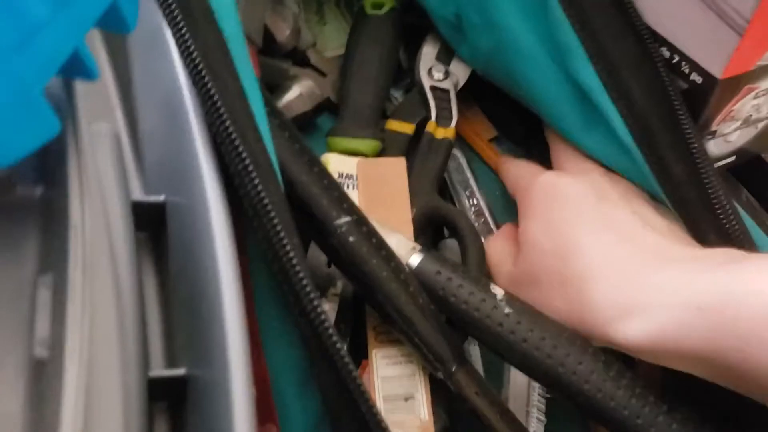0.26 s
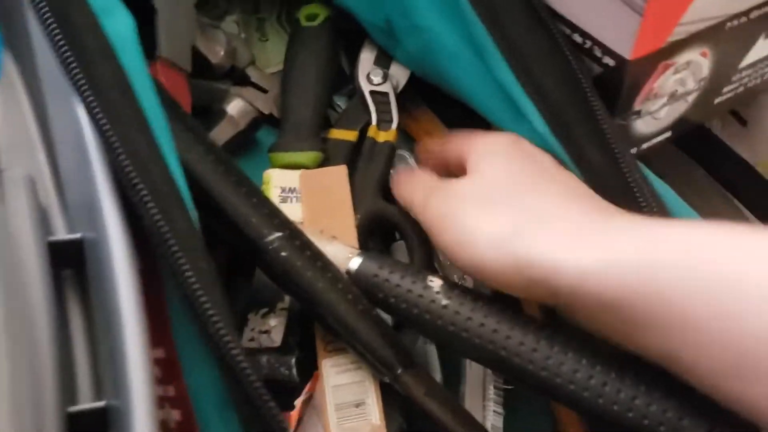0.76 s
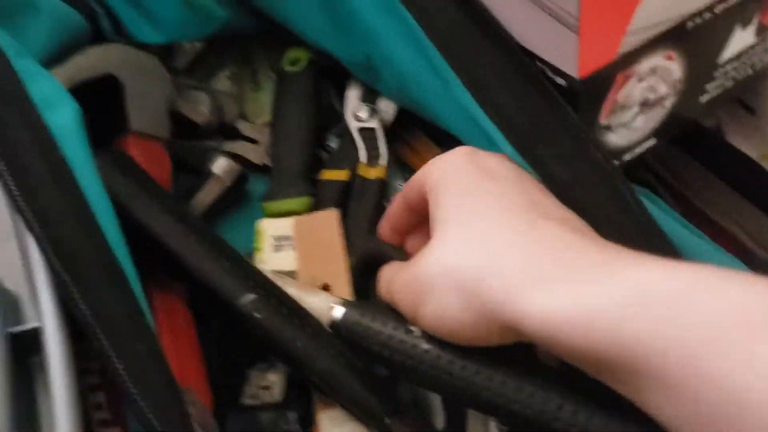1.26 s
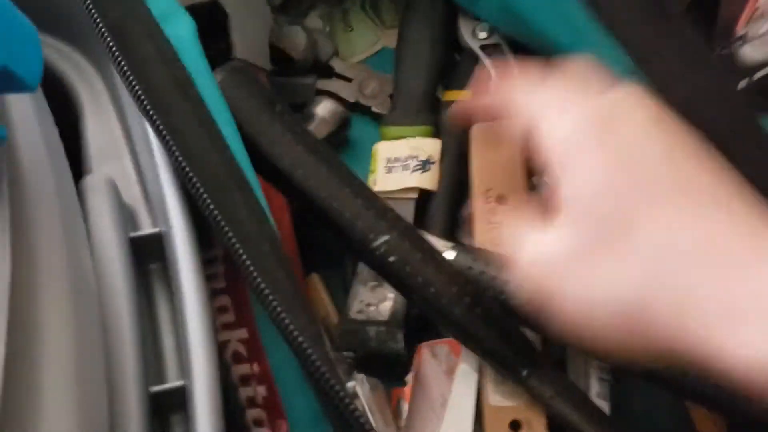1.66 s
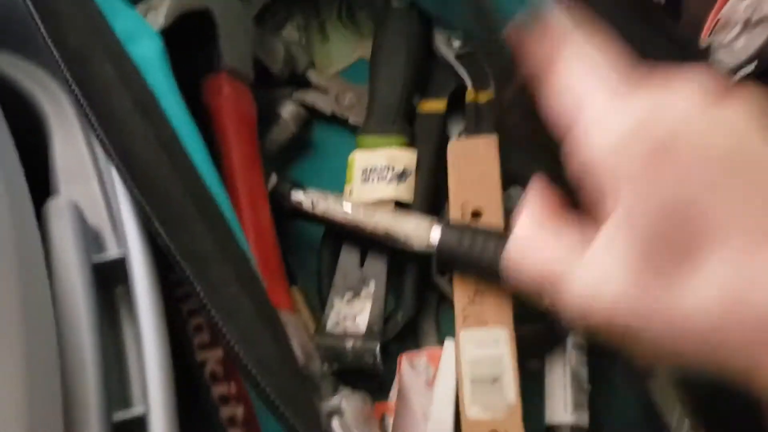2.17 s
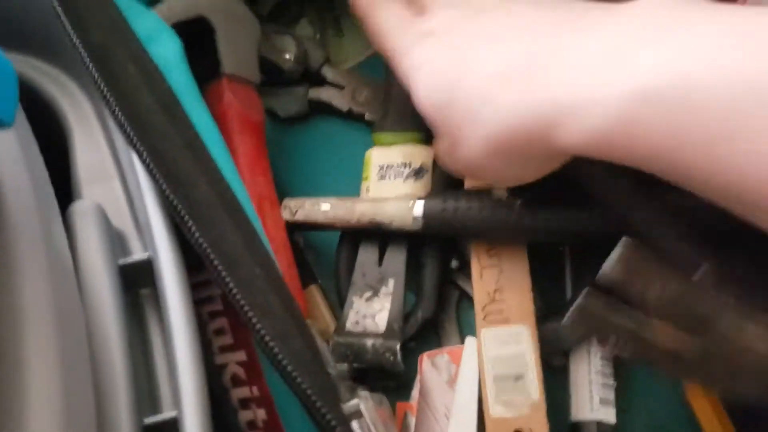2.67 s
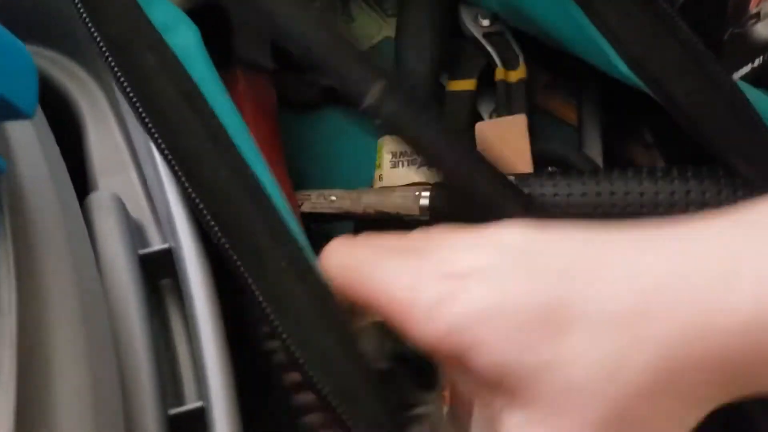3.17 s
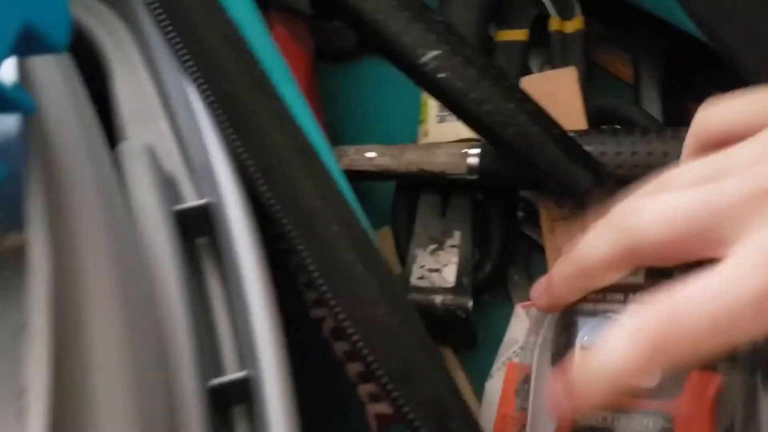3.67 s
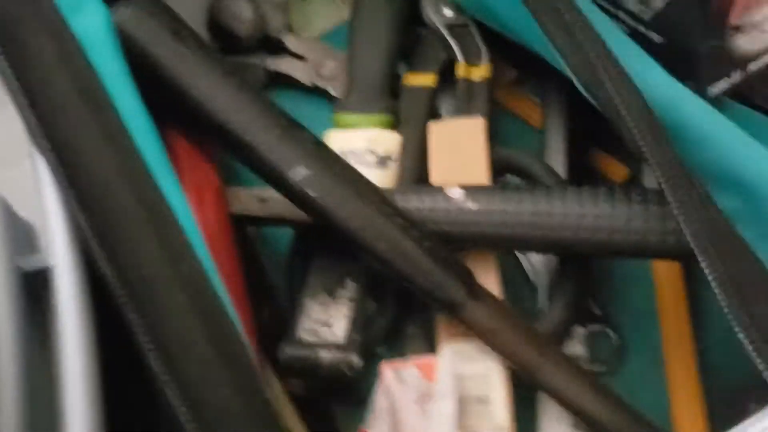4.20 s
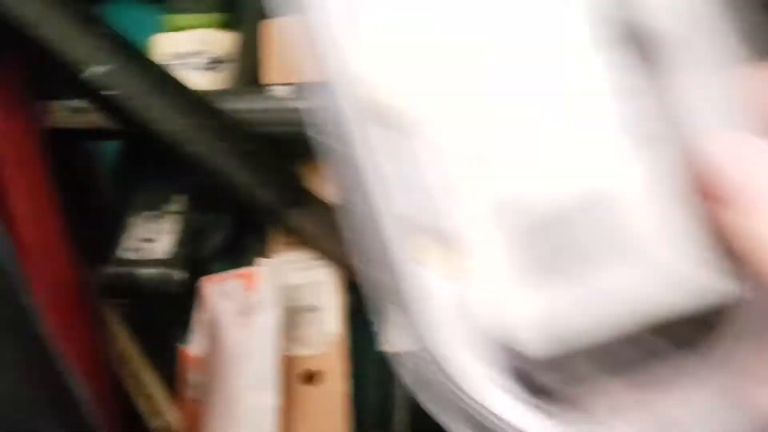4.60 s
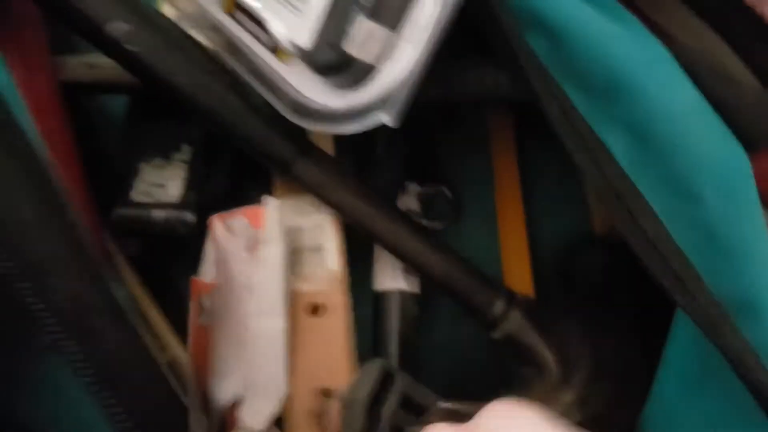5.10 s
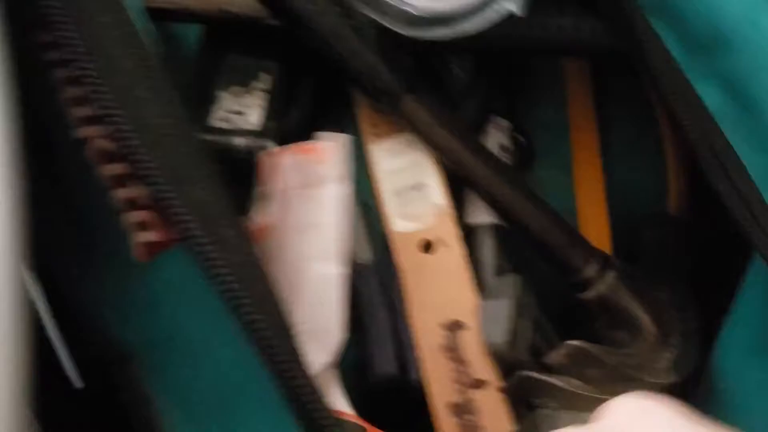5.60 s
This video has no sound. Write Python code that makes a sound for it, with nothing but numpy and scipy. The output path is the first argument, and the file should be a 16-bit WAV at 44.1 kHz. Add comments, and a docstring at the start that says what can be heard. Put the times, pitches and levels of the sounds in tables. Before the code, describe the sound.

A hand rummages through a soft bag of tools, with close rustling, knocks and a few metal clinks, sparse at first, then busier.

```python
"""At a soft bag of tools, under a hand-held phone, a hand rummages. Friction and impacts excite the
resonances of the bag, the tool handles, the stiff fabric and the floor beneath. Steel tools clink
in freely decaying modes, and some knocks carry a hollow note. A finger covers the left microphone
port: it shields that side from the treble, and bumps and taps on the port as it shifts."""
import sys
import numpy as np
from scipy import signal
from scipy.io import wavfile
from scipy.ndimage import uniform_filter1d

SR = 44100
rng = np.random.default_rng(int(sys.argv[2]) if len(sys.argv) > 2 else 0)


def generate_wav(sig):
    """Save sig (samples, or channels by samples) to the path in sys.argv[1] as 16-bit PCM at SR."""
    pcm = np.round(np.clip(np.atleast_2d(sig).T, -1, 1) * 32767).astype(np.int16)
    wavfile.write(sys.argv[1], SR, pcm)


N = 257984

# How hard the hand stirs. Each row: time in seconds, effort in dB.
EFFORT = [(0.02, -55), (0.2, -69), (0.45, -69.5), (0.75, -74), (0.9, -62), (1.39, -60.5), (1.462, -43),
          (1.551, -48), (1.8, -55), (2.04, -55), (2.25, -46), (2.53, -50.5), (2.823, -50), (2.85, -61),
          (2.952, -63), (2.965, -33), (3.03, -44), (3.42, -38.5), (3.6, -57), (3.789, -59), (3.828, -44),
          (3.93, -38), (3.95, -46.5), (3.98, -40.5), (4.03, -44), (4.09, -49.5), (4.1, -36), (4.172, -32.5),
          (4.25, -48.5), (4.41, -47), (4.63, -58.5), (4.76, -42.5), (5.1, -59), (5.251, -40.5),
          (5.421, -58.5), (5.63, -46.5), (5.84, -53)]
# Rubbing of floor, bag, handles and fabric. Each row: drive in dB at middle effort, dB per dB of effort.
RUB_LAWS = [(-43, 0.86), (-44.5, 1.5), (-47.5, 1.39), (-48.5, 0.89)]
# Knocks and scrapes. Each row: start in seconds, contact time in ms, bag, handle and fabric levels in dB.
CONTACTS = [(0.115, 69, -52, -64, -50.5), (0.6193, 2.9, -33.5, -46, -42.5), (0.86, 71, -63, -85, -58),
            (1.155, 50, -56, -55.5, -55.5), (1.493, 6.8, -39.5, -39, -36), (1.613, 2.5, -46, -60, -41.5),
            (1.645, 8.2, -40, -51, -41), (1.669, 2.1, -61, -64, -32), (1.734, 27, -71, -68, -40),
            (1.81, 5.1, -39.5, -46, -72), (1.891, 13.8, -38, -36, -53), (1.927, 8.8, -30.5, -39.5, -51),
            (1.96, 32, -48, -50.5, -44.5), (2.077, 5.6, -38.5, -40.5, -60),
            (2.243, 12, -30.5, -39.5, -45.5), (2.274, 5.7, -28, -34.5, -42.5),
            (2.3605, 3.54, -9, -23.5, -45), (2.592, 5.2, -36, -27, -58), (2.734, 5.5, -33.5, -44, -62),
            (2.761, 5.2, -33.5, -47, -41), (2.793, 3.8, -38.5, -35.5, -62), (2.96, 10, -28.5, -28, -38),
            (2.991, 7.9, -29, -34, -16.5), (3.071, 17.5, -32, -41.5, -29), (3.106, 7.8, -38, -32, -42),
            (3.124, 18, -27, -71, -77), (3.186, 2.6, -26, -42, -59), (3.208, 2.4, -55.5, -32, -29),
            (3.253, 16.8, -18, -27, -30), (3.291, 110, -38, -36.5, -47.5), (3.336, 58, -25, -23, -26),
            (3.531, 6.3, -23, -32.5, -32.5), (3.542, 23.6, -40.5, -38, -46.5), (3.622, 11.5, -72, -60, -54),
            (3.741, 12.7, -44.5, -50.5, -56), (3.879, 9.4, -28.5, -37, -41.5), (3.916, 47, -34, -45.5, -53),
            (3.965, 42.4, -43, -40, -38), (4.094, 4.4, -22, -19, -25.5), (4.111, 4.9, -16, -21.5, -27.5),
            (4.208, 4.8, -35, -34, -47), (4.286, 6.8, -34.5, -34.5, -42.5),
            (4.301, 27.8, -29.5, -30.5, -37.5), (4.322, 5.2, -22.5, -55, -46),
            (4.348, 21, -39.5, -40.5, -53), (4.459, 58.5, -42, -41.5, -45.5), (4.51, 7, -33.5, -32, -32.5),
            (4.609, 6, -45, -48, -49), (4.833, 10.3, -19.5, -21, -34.5), (4.86, 13.2, -23, -25, -38.5),
            (4.945, 4.8, -16, -25, -39), (4.955, 10.5, -20.5, -26.5, -35.5), (5.129, 22, -42, -46, -43),
            (5.218, 22.7, -30.5, -33, -38), (5.288, 9.5, -27, -28, -37.5), (5.472, 2.9, -42.5, -38, -40.5),
            (5.55, 1.8, -73, -67, -33.5), (5.591, 16, -51, -44.5, -34), (5.734, 70, -79, -52, -48)]
# Resonances of the four bodies. Each row: frequency in Hz, bandwidth in Hz, gain in dB.
FLOOR_MODES = [(62, 100.6, 0.5), (135, 49.4, 3.5)]
BAG_MODES = [(160, 193, -4), (323, 97.6, 5), (404.8, 42.4, 4.5), (554, 140, -8.5)]
HANDLE_MODES = [(hz, hz / 9, db) for hz, db in [(716, 0), (960, 0.5), (1180, 5.5), (1420, 5), (1670, 3.0),
                (2050, 3.0), (2420, 1.0), (2860, 1.5), (3320, -2.5), (3600, -1.0)]]
FABRIC_MODES = [(4160, 1770, 8), (5090, 1820, 14), (7000, 720, -24), (8420, 2200, 6), (10500, 11450, 9)]
# Steel striking steel. Each row: start in seconds, level in dB, index of the tool.
STEEL_CLINKS = [(2.591, -36, 2), (2.991, -20, 0), (3.071, -24.5, 0), (5.288, -35, 1), (5.298, -30, 1)]
# Modes of three steel tools, a list for each. Each row: frequency in Hz, gain in dB, T60 in seconds.
STEEL_MODES = [
    [(1176, -4, .09), (2207, -10, .04), (4100, -7, .06), (4337, -4, .04), (5270, -1, .045),
     (6370, -1, .035), (8875, -8, .07), (11930, -11, .1)],
    [(2420, 0, .03), (3580, 0, .04), (4371, -8, .06), (9480, -9, .09), (14030, -8, .11)],
    [(1640, 0, .07), (2040, -5, .04), (2876, 0, .04), (4888, -5, .06)],
]
# Short pitched rings of some knocks. Each row: start in seconds, level in dB, frequency in Hz, T60 in ms.
KNOCK_TONES = [(0.618, -23.5, 1500, 8.9), (0.6176, -17, 290, 30), (1.893, -34.5, 2900, 35),
               (1.579, -37.5, 1740, 60), (1.646, -35, 1040, 30), (2.34, -13.5, 760, 12)]
# The finger shifts on the port. Each row: start in seconds, level in dB.
FINGER_BUMPS = [(0.033, -28.5), (0.19, -29), (0.727, -19.5), (0.761, -21.5), (0.898, -20), (0.941, -26),
                (1.072, -29.5), (1.124, -28), (1.246, -25), (1.278, -26.5), (2.144, -27), (2.468, -22.5),
                (2.644, -21), (2.664, -22.5), (3.109, -27.5), (3.614, -28), (4.276, -29), (4.476, -29),
                (4.696, -28), (5.275, -25), (5.385, -24.5)]
# It slips off the port's edge. Each row: start in seconds, level in dB, base pitch in Hz,
# length in periods of that pitch.
FINGER_TAPS = [(4.824, -10, 1000, 2.2), (5.6456, -1.6, 1100, 3.2), (5.667, -26, 950, 5.0),
               (5.7073, -13, 1050, 4.0), (5.7192, -10, 185, 1.0), (.881, -22, 105, .9),
               (1.857, -24, 95, .9)]
# Air pocket under the finger. Each row: frequency in Hz, bandwidth in Hz, gain in dB.
POCKET_MODES = [(1310, 1050, -12), (1800, 530, -4.5)]

MIDDLE_EFFORT_DB = -45
HARD_OCTAVES, HARD_AT_DB, HARD_RANGE_DB = 0.72, 4.5, 6  # how a contact's hardness shifts its colour
TAP_SAG, TAP_SAG_CYCLES = 1.5, 1.5  # initial excess pitch as a share of the base; its decay in periods
TAP_CLICK_HZ, TAP_CLICK_DB, TAP_PUFF_DB = 4200, -24, -13
GRIP_DB, POCKET_DB, HISS_DB = -45, -58.5, -63.5
COVER_HZ, PORT_LAG_SAMPLES, TOP_HZ = 2630, 4, 15750


def rummage():
    """Superposition: each body responds to rubbing plus knocks. Returns floor, bag and bright parts."""
    floor, bag, handles, fabric = rubbing()
    bag += knocks(BAG_MODES, column=2, rate=400, strike=3, spread_db=2.5, tail=.2, crack_hz=250)
    handles += knocks(HANDLE_MODES, column=3, rate=1200, strike=1.8, spread_db=2, tail=.12, tilt_db=8)
    fabric = cut(fabric, 2670, "high", order=1)  # light strokes are brighter than knocks
    fabric += knocks(FABRIC_MODES, column=4, rate=3000, strike=.6, spread_db=2.5, tail=.05,
                     dull_db=.4, crack_hz=6000)
    thuds = knocks(FLOOR_MODES, column=2, rate=13, strike=4.7, spread_db=6, tail=.25, crack_hz=150)
    floor += undb(-14) * thuds  # the floor answers each knock on the bag
    return cut(floor, 51, "high"), cut(bag, 640, "low", order=3), handles + fabric


def knocks(modes, column, rate, strike, spread_db, tail, tilt_db=0, dull_db=0, crack_hz=0):
    """Impact excitation: the point of contact weights the modes, and short contacts open with a blow."""
    out, t = np.zeros(N), np.arange(SR // 6) / SR
    friction = stick_slip(rate, 2.2)
    for row, draws in zip(CONTACTS, rng.standard_normal((len(CONTACTS), len(modes), 2))):
        start, contact_ms, bag_db, handle_db, fabric_db = row
        contact_s, level_db = contact_ms / 1000, row[column]
        # A contact that rings the bag less than the rest is harder and favours the upper modes.
        hardness = HARD_OCTAVES * np.tanh((max(handle_db, fabric_db) - bag_db - HARD_AT_DB) / HARD_RANGE_DB)
        tilt = tilt_db * hardness - dull_db * (level_db - MIDDLE_EFFORT_DB)  # heavy strokes are duller
        struck = [(hz * (1 + .025 * detune), width, db + spread_db * weight + tilt * np.log2(hz / 1500))
                  for (hz, width, db), (detune, weight) in zip(modes, draws)]
        rise = np.minimum(t / (4 * contact_s ** 2), 1)  # long scrapes swell, short knocks jump
        envelope = rise / (1 + (t / contact_s) ** 6) + tail * np.exp(-t / .047)
        scrape = np.roll(friction, -int(start * SR))[:len(t)] * envelope
        blow = -strike * np.sqrt(contact_s * SR) * np.exp(-contact_s / .0042) * (t == 0)
        centre_hz = crack_hz or 1500 * 2 ** hardness
        crack = ring(blow, [(centre_hz, centre_hz, 0)])  # the blow also comes straight through
        sound = ring(scrape + blow, struck) + crack
        contact_rms = np.sqrt(np.sum(sound ** 2) / (contact_s * SR))
        add(out, start, undb(level_db) * sound / contact_rms)
    return out


def rubbing():
    """Forced vibration: friction drives floor, bag, handles and fabric, growing with the hand's effort."""
    effort_db = np.interp(np.arange(N) / SR, *np.transpose(EFFORT)) - MIDDLE_EFFORT_DB
    jostle_db = 1.5 * wander(25)  # one hand moves all bodies at once
    folds = crinkle(rate=70, decay_s=.008)

    def rub(modes, law, rate, flicker_db=1, buckling=1):
        middle_db, slope = law
        force = stick_slip(rate, 2.5, smooth=.9)
        drive = undb(middle_db + slope * effort_db + jostle_db + flicker_db * wander(13)) * buckling
        return ring(drive * force, modes) / np.std(ring(force, modes))

    return (rub(FLOOR_MODES, RUB_LAWS[0], rate=60),
            rub(BAG_MODES, RUB_LAWS[1], rate=300),
            rub(HANDLE_MODES, RUB_LAWS[2], rate=900, buckling=folds),
            rub(FABRIC_MODES, RUB_LAWS[3], rate=2500, flicker_db=2, buckling=folds))


def stick_slip(rate, spread_db, smooth=1):
    """Stick-slip friction: uneven slips, `rate` a second on average, over the noise of smooth sliding."""
    slips = (rng.random(N) < rate / SR) * rng.standard_normal(N)
    slips *= undb(spread_db * rng.exponential(size=N))
    return unit(unit(slips) + smooth * rng.standard_normal(N))


def crinkle(rate, decay_s):
    """Buckling: folds give way at random, each a jump in amplitude that dies away."""
    folds = (rng.random(N) < rate / SR) * rng.exponential(size=N)
    return unit(1.75 + signal.lfilter([1], [1, -np.exp(-1 / (decay_s * SR))], folds))


def steel_clinks():
    """Free vibration: a brief chatter excites a steel tool's modes, which then decay on their own."""
    out, t = np.zeros(N), np.arange(SR // 4) / SR
    for start, db, tool in STEEL_CLINKS:
        chatter = (t == 0) + .08 * rng.standard_normal(len(t)) * np.exp(-t / .004)
        for hz, mode_db, t60 in STEEL_MODES[tool]:
            mode = signal.fftconvolve(chatter, damped_sine(t, hz, t60))[:len(t)]
            add(out, start, undb(db + mode_db) * mode)
    return out


def knock_tones():
    """Damped oscillation: short pitched rings give some knocks a hollow note."""
    out, t = np.zeros(N), np.arange(SR // 4) / SR
    for start, db, hz, t60_ms in KNOCK_TONES:
        add(out, start, -undb(db) * damped_sine(t, hz, t60_ms / 1000))
    return out


def finger_bumps():
    """Pressure pulses: the finger shifts on the port, giving low bumps that sag in pitch."""
    out, t = np.zeros(N), np.arange(SR // 12) / SR
    envelope = np.exp(-(t / .028) ** 2) * np.minimum(t / .0023, 1)
    for (start, db), hz in zip(FINGER_BUMPS, 58 + 6 * rng.standard_normal(len(FINGER_BUMPS))):
        turns = hz * t + .62 * (1 - np.exp(-t / .0046))
        add(out, start, -undb(db) * np.sin(2 * np.pi * turns) * envelope)
    return out


def finger_taps():
    """Transients: a slip off the port's edge gives a falling tone, a puff and, at times, a click."""
    out, t = np.zeros(N), np.arange(SR // 12) / SR
    for start, db, hz, cycles in FINGER_TAPS:
        progress = np.minimum(hz * t / cycles, 1)
        turns = hz * t + TAP_SAG * TAP_SAG_CYCLES * (1 - np.exp(-hz * t / TAP_SAG_CYCLES))
        click = undb(TAP_CLICK_DB) * (cycles > 2) * np.sin(2 * np.pi * TAP_CLICK_HZ * t)
        puff = undb(TAP_PUFF_DB) * np.sin(2 * np.pi * progress)
        envelope = np.sin(np.pi * progress ** .55) ** 2
        add(out, start, undb(db) * (np.sin(2 * np.pi * turns) + click + puff) * envelope)
    return out


def finger_grip():
    """Friction and cavity resonance: the restless grip rumbles, and the air pocket under it hisses."""
    rumble = cut(ring(stick_slip(33, 1.1), [(55, 55.7, -4.5), (97, 133, -12)]), 32, "high")
    pocket = cut(ring(rng.standard_normal(N), POCKET_MODES), [800, 3000], "band")
    return undb(GRIP_DB + 5 * wander(21)) * unit(rumble) + undb(POCKET_DB + 2 * wander(2.78)) * unit(pocket)


def covered_port(bright):
    """Acoustic low-pass: the pocket under the finger resonates and lets only a trace of treble pass."""
    arriving = scatter(bright, share=.8, decay_s=.004)
    muffled = cut(arriving + .5 * ring(arriving, [(1700, 1000, 0)]), COVER_HZ, "low", order=3)
    return muffled + undb(-33) * scatter(arriving, share=.11, decay_s=.0033)


def scatter(x, share, decay_s):
    """Scattering round hand and phone: a share of the energy arrives as close, shifting reflections."""
    t = np.arange(SR // 20) / SR
    responses = rng.standard_normal((2, len(t))) * np.exp(-t / decay_s)
    angle = np.pi * wander(8)
    first, second = (signal.fftconvolve(x, h)[:N] / np.sqrt(np.sum(h ** 2)) for h in responses)
    reflected = np.cos(angle) * first + np.sin(angle) * second
    return np.sqrt(1 - share) * x + np.sqrt(share) * reflected


def background_hiss():
    """Stationary noise: a low band and a faint high hiss, 14 dB weaker on the covered left side."""
    noise = unit(ring(rng.standard_normal(N), [(270, 110, 14), (4960, 5000, -30), (13000, 4700, -12)]))
    return undb(HISS_DB + np.array([[-14], [0]])) * noise


def ring(x, modes):
    """Modal summation: parallel resonators, neighbours in opposite phase."""
    return sum((-1) ** k * undb(db) * signal.lfilter(*signal.iirpeak(hz, hz / width, SR), x)
               for k, (hz, width, db) in enumerate(modes))


def damped_sine(t, hz, t60):
    """Exponential decay: one mode falls 60 dB in t60 seconds."""
    return np.sin(2 * np.pi * hz * t) * np.exp(-np.log(1000) * t / t60)


def wander(rate):
    """Random modulation: levels held 1 / rate seconds and smoothed twice; spread near 1."""
    hold = int(SR / rate)
    steps = np.repeat(rng.standard_normal(N // hold + 1), hold)
    return 1.3 * uniform_filter1d(uniform_filter1d(steps, hold), hold)[:N]


def cut(x, hz, kind, order=2):
    return signal.sosfilt(signal.butter(order, hz, kind, fs=SR, output="sos"), x)


def undb(db):
    return 10 ** (np.asarray(db) / 20)


def unit(x):
    return x / np.sqrt(np.mean(x ** 2))


def add(track, start, sound):
    i = int(start * SR)
    track[i:i + len(sound)] += sound[:N - i]


def scene():
    """Acoustic shadowing: the right port hears the bag directly, the covered left one late and dull."""
    floor, bag, bright = rummage()
    bright = bright + steel_clinks() + knock_tones()
    covered = covered_port(bright)
    low = scatter(floor, share=.45, decay_s=.02) + scatter(bag, share=.12, decay_s=.006)
    left = np.roll(low + covered, PORT_LAG_SAMPLES) + finger_bumps() + finger_taps() + finger_grip()
    right = floor + bag + bright
    return np.array([left, right]) + background_hiss()


def record(dry):
    """Band limiting: the phone's steep low-pass filter cuts the highest treble."""
    return signal.sosfilt(signal.ellip(8, .2, 70, TOP_HZ, fs=SR, output="sos"), dry)


dry = scene()
out = record(dry)
generate_wav(out)
```